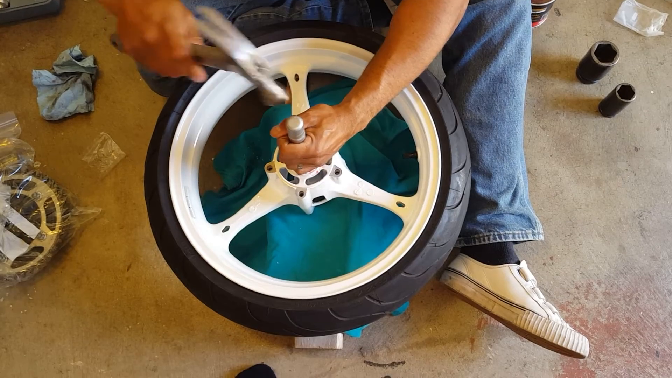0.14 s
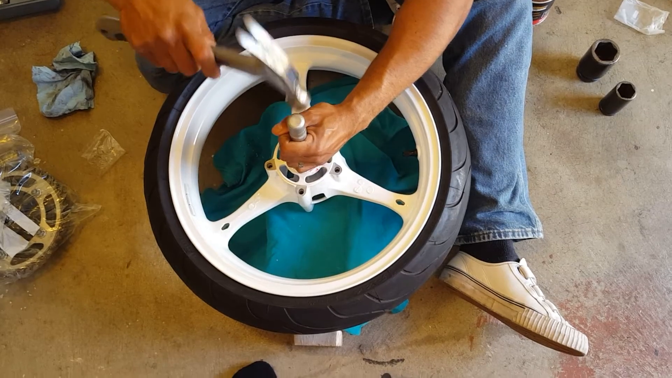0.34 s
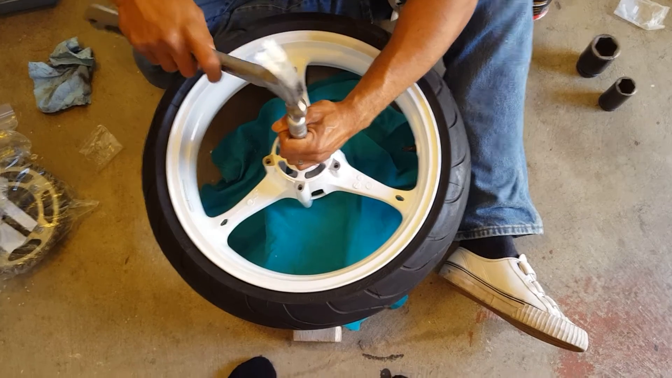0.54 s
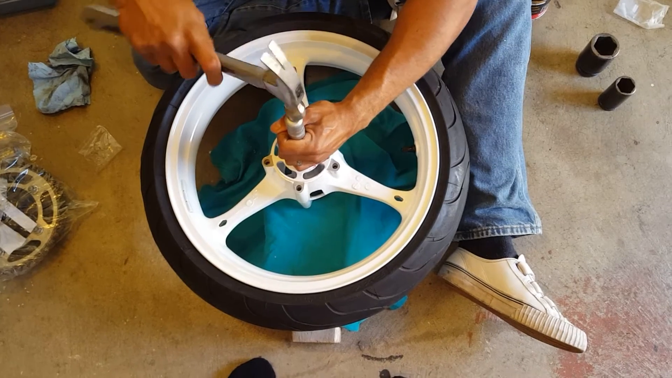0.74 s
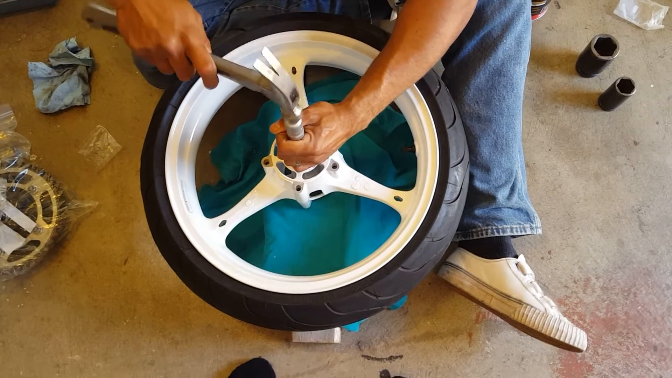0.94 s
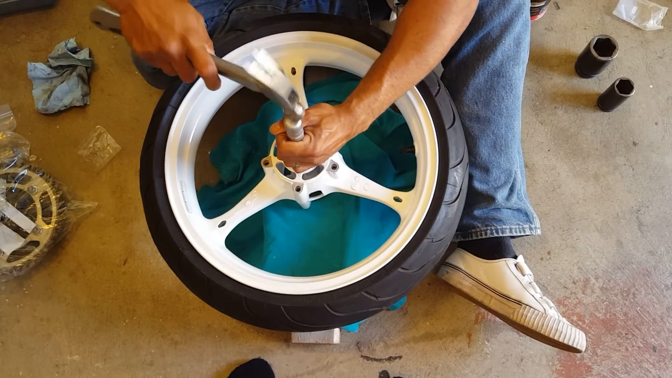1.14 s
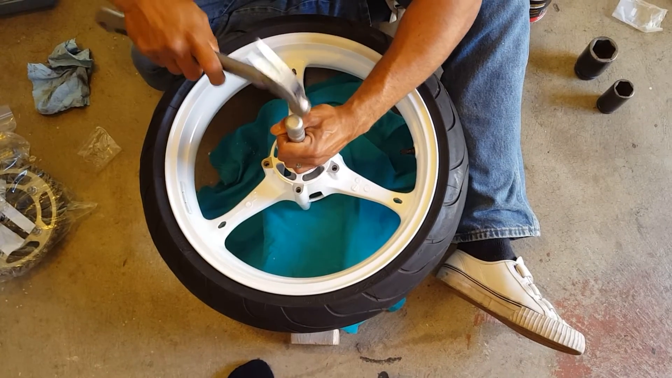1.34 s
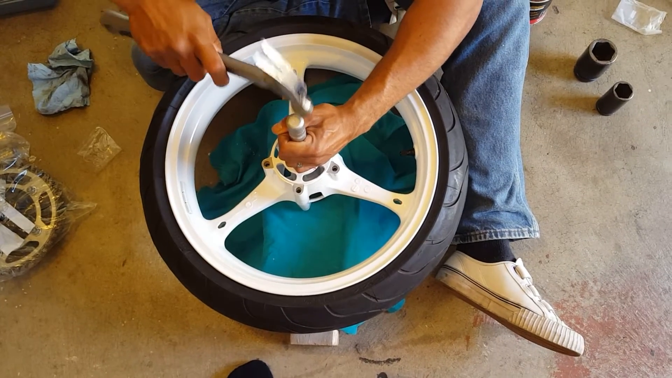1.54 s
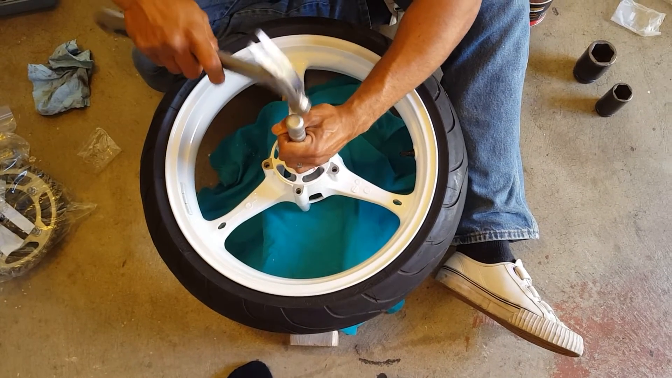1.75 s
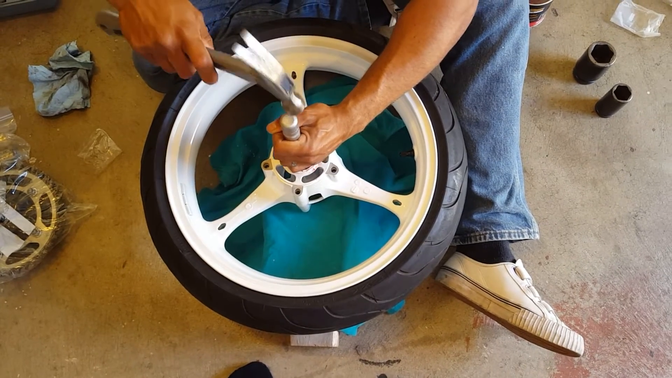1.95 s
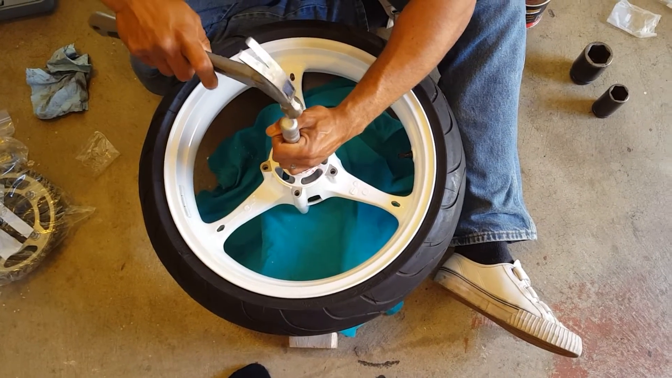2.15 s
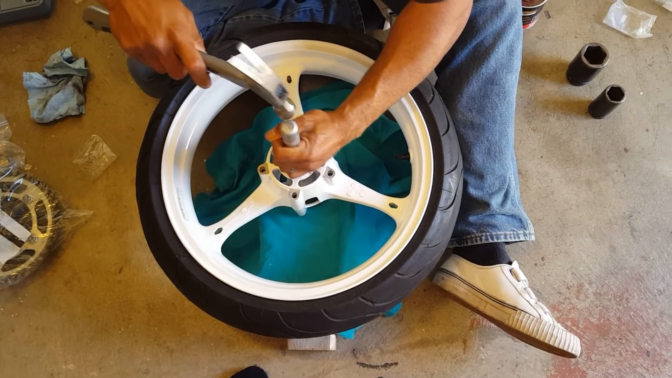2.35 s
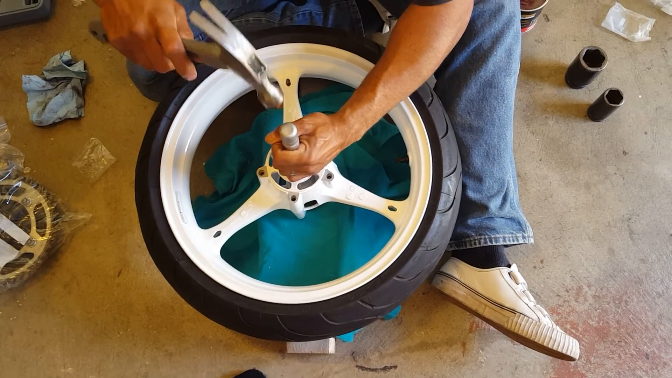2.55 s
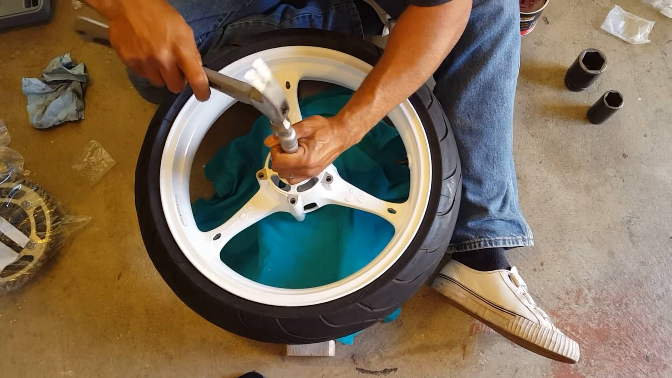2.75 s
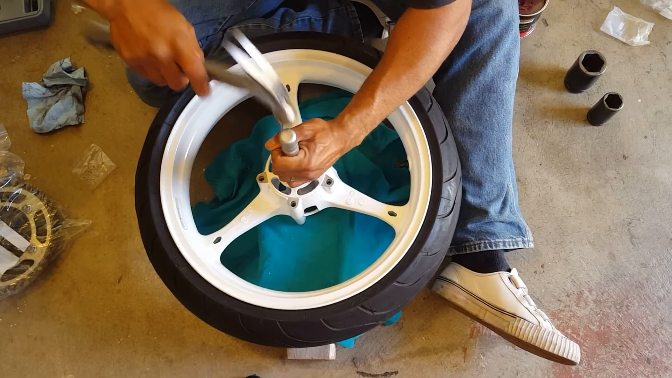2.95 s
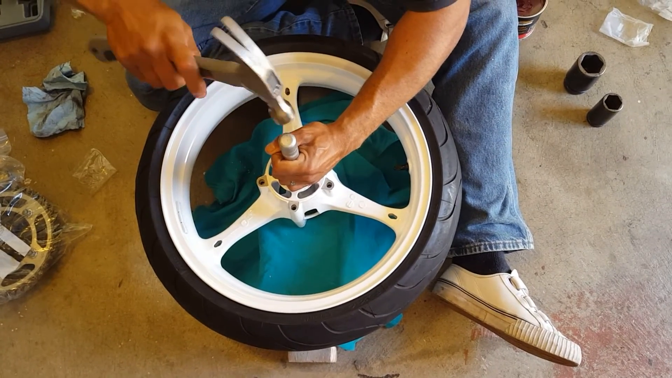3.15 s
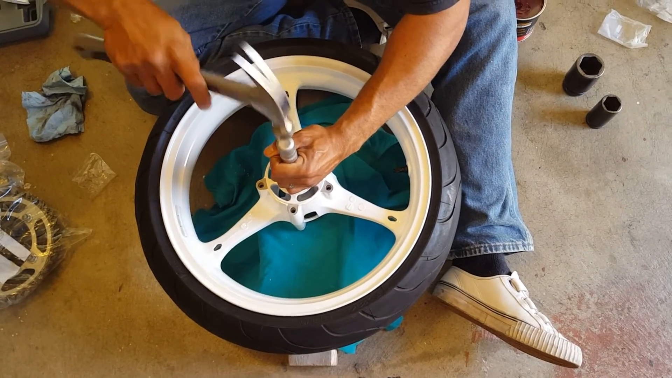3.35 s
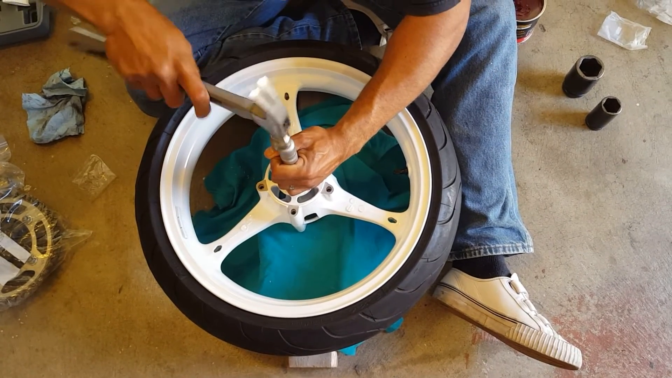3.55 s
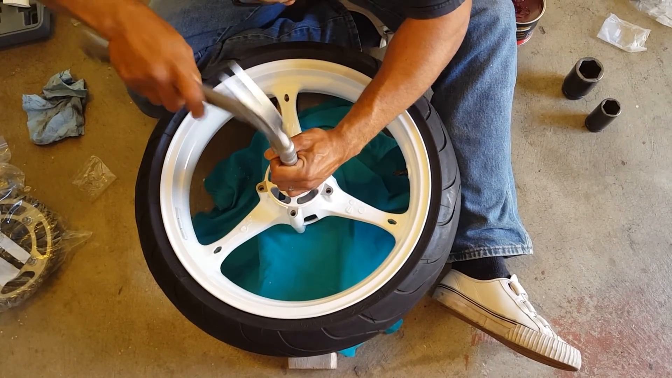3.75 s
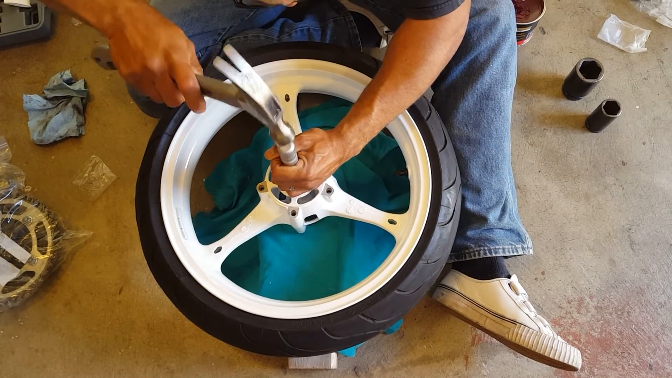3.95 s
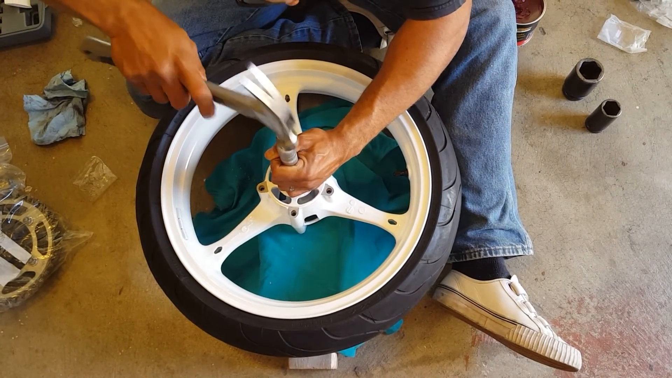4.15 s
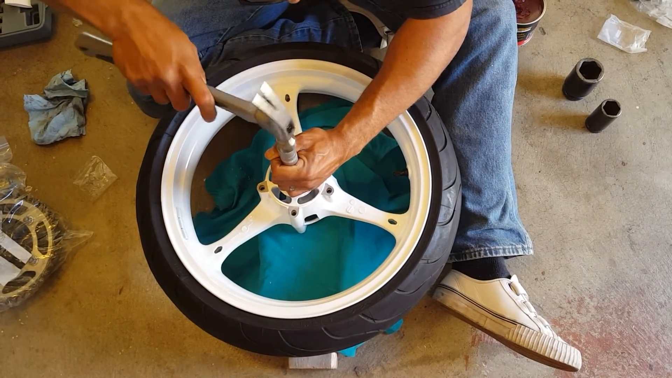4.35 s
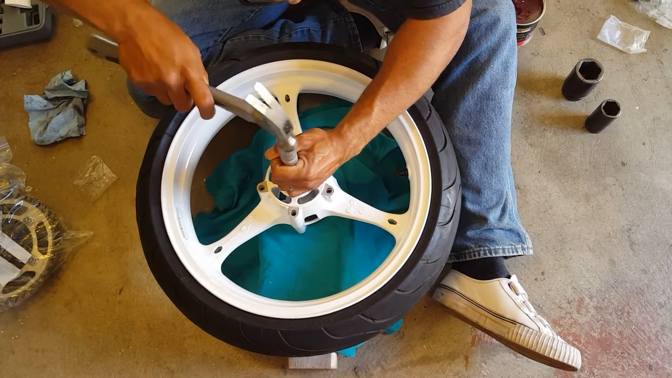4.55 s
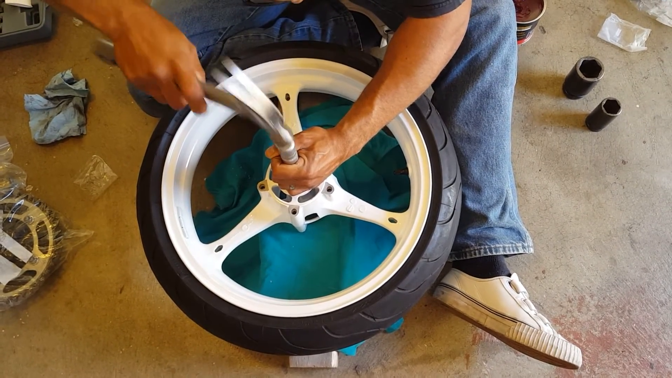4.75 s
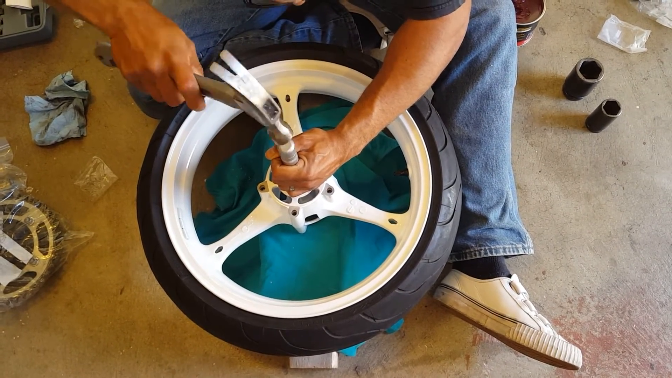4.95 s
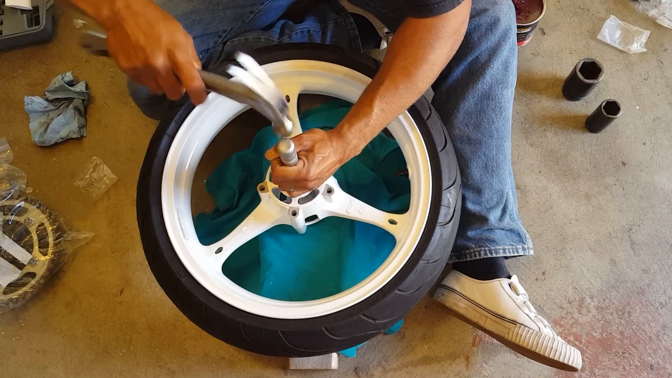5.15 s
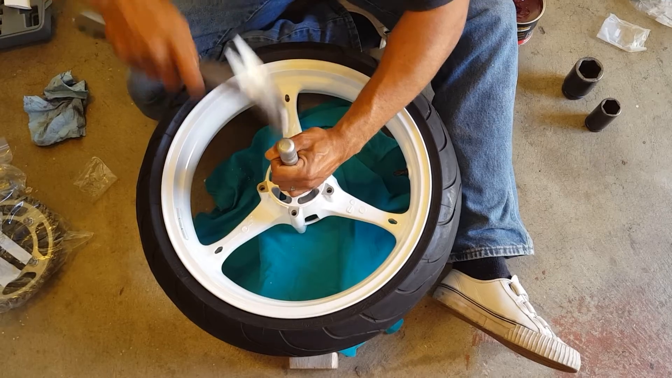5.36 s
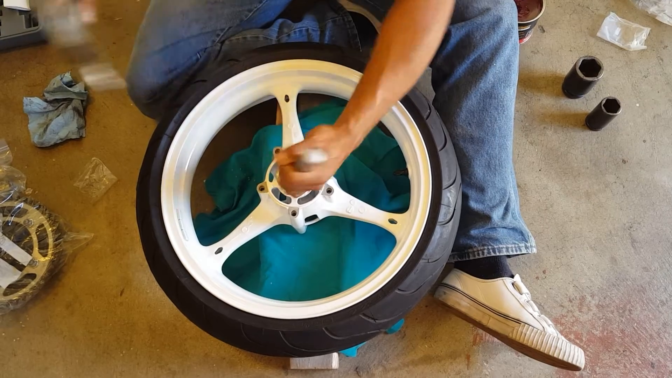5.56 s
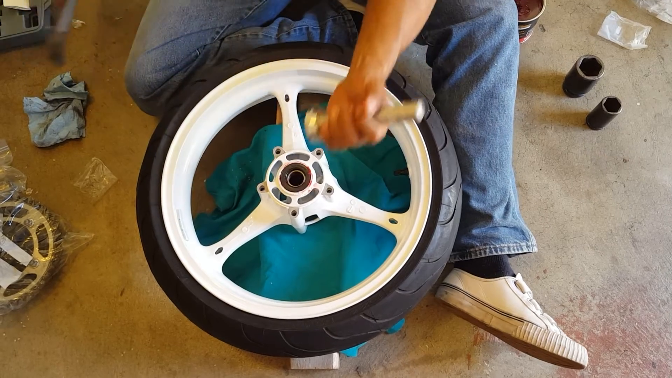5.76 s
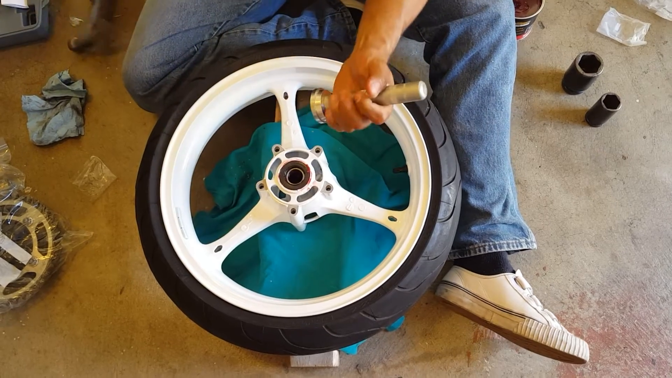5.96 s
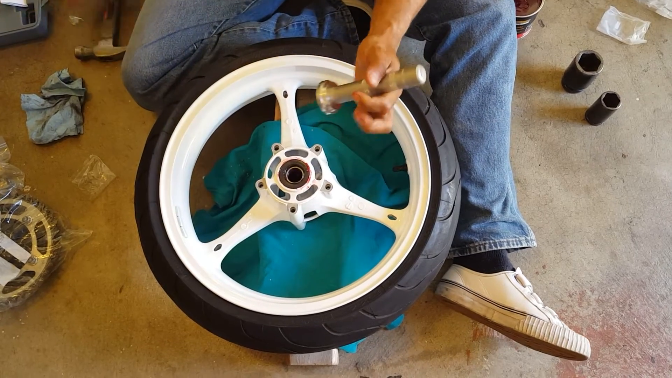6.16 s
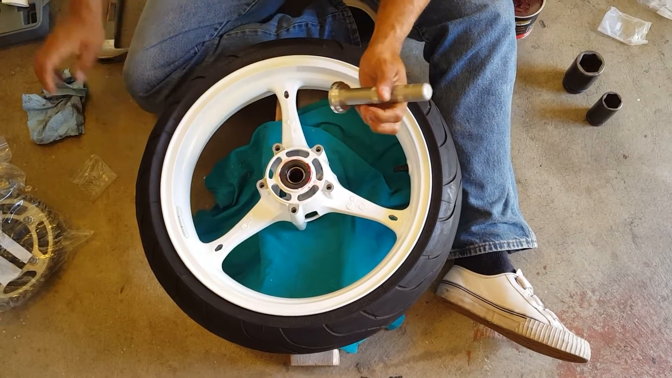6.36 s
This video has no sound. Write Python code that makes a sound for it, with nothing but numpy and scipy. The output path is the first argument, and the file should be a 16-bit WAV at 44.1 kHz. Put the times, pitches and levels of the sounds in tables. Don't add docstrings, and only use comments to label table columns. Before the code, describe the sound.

For the first half second, distant birds chirp and whistle outside over airy ambience and a low engine drone. At 0.5 s a steel hammer lands its strongest blow on a metal driver in a wheel hub: sharp crack, hollow thud, short high ring, and a bright garage echo lasting about half a second. Lighter taps follow every 0.2 s or so until 2.0 s, with a barely audible touch at 2.3 s. From 2.8 to 5.3 s a second, even run of eleven blows comes about every quarter second, less boomy, the knock growing firmer and the contact crisper, with faint floor thumps. The background sinks as the blows begin. Echo dies away; faint bird notes return from 5.7 s. Around 6.0 s the hammer softly touches concrete, lands with a clack at 6.1 s, and rattles in small ringing bounces until 6.3 s. Close stereo phone pickup from above.

```python
import sys
import numpy as np
from scipy import signal
from scipy.fft import rfft, irfft, next_fast_len
from scipy.io import wavfile
from scipy.ndimage import uniform_filter1d, minimum_filter1d

SR = 44100
rng = np.random.default_rng(int(sys.argv[2]) if len(sys.argv) > 2 else 0)


def volts_from_db(level):
    exponent = np.asarray(level, float) / 20
    return 10 ** exponent


def store_wav(level_fs):
    pcm = np.round(np.clip(np.atleast_2d(level_fs), -1, 1) * 32767)
    wavfile.write(sys.argv[1], SR, pcm.T.astype(np.int16))


N = 282284

# (frequency [Hz], level [dB])
OUTSIDE_TONE = [(25, -21), (82, -6), (250, -11.5), (1500, -26.5), (1750, -28.5), (3000, -25), (3900, -31.5),
                (5700, -44), (7300, -31), (9300, -50.5), (12200, -38), (16000, -46)]
# (frequency [Hz], width [Hz], level [dB])
ENGINE_HUMS = [(75.5, 11, -1.5), (146, 18, -7), (56.7, 18, -8.5)]
# (time [s], pitch [Hz], level [dB])
CHIRP_SHAPE = [(0, 1690, -12), (.030, 1800, -1), (.038, 2600, 4), (.05, 2800, -5), (.063, 3050, 0),
               (.071, 3950, -11)]
# (time [s], level [dB])
CHIRP_TIMES = [
    (0.011, -60),
    (0.152, -59),
    (0.292, -59.5),
    (0.439, -60.5),
    (5.698, -71.5),
    (5.846, -72),
    (5.991, -69.5),
]
# (time [s], length [s], start pitch [Hz], end pitch [Hz], level [dB])
WHISTLE_NOTES = [
    (0, 0.039, 2670, 2630, -47),
    (0.224, .03, 3000, 2550, -44),
    (.245, .045, 2510, 2400, -32),
    (0.286, .045, 2380, 1990, -30),
    (0.336, 0.1, 1960, 2088, -42.5),
    (5.837, 0.068, 2584, 2750, -59),
    (5.898, 0.096, 2378, 2282, -48.5),
    (5.98, 0.133, 3400, 3310, -59),
    (6.076, 0.056, 2310, 2310, -53),
]
# (frequency [Hz], time to fade 60 dB [s])
GARAGE_FADE = [(60, 0.72), (230, 0.46), (450, 0.53), (900, 0.67), (1840, 0.66), (4850, 0.62), (8000, 0.5),
               (12800, 0.29)]
# (frequency [Hz], level [dB])
GARAGE_COLOUR = [(90, -10), (230, -3.5), (420, -3.5), (800, -9), (1840, -3), (2350, -6), (4850, -5),
                 (8000, -8.5), (12800, -9)]
# (frequency [Hz], likeness [0-1])
GARAGE_LIKENESS = [(100, 1), (400, 0.92), (800, 0.3), (1500, 0), (4000, .05), (12000, 0.29)]
# (delay [s], level [dB])
FIRST_ECHOES = [
    (.0078, -15),
    (.0128, -16),
    (.0165, -18),
]
# (frequency [Hz], level [dB])
ECHO_COLOUR = [(300, 2.5), (2200, 7), (5000, -5)]
# (time [s], strength [dB], sharpness [dB], spot across face [mm], spot along face [mm])
HAMMER_BLOWS = [(0.5223, -9, -2, -5, 10.5), (0.7597, -13.5, -3.5, 5, 16), (0.9836, -15, -2.5, 0.5, 3),
                (1.1899, -15.5, 0.5, -42, -1.5), (1.4018, -15.5, -16.5, 8.5, -15.5),
                (1.5977, -19, -5.5, -7, 1.5), (1.8125, -16, -1.5, -3.5, 0), (2.032, -20.5, 6, 6.5, 6),
                (2.2935, -40, -47, 7, 10), (2.7845, -16, 1, -7, 2), (3.049, -14.5, -0.5, 8.5, -18.5),
                (3.3142, -15, -5.5, 4.5, -13.5), (3.5798, -14, -0.5, -5, -8), (3.8414, -14, 2, -1, -5),
                (4.1042, -15, 6, 0, -8.5), (4.3555, -15, 5.5, 2, -8), (4.5994, -15.5, 7.5, 4, -5),
                (4.8479, -14.5, 6, -8, -3.5), (5.0865, -14, 7.5, -7, -4.5), (5.3248, -15, 2.5, -7, -0.5)]
# (frequency [Hz], level [dB])
CRACK_COLOUR = [(90, -24.5), (170, 0.5), (330, 15.5), (700, 14.5), (1350, 11.5), (1660, 5.5), (2100, 6),
                (3000, 8.5), (3900, 0.5), (7600, 8), (8900, -2.5), (9600, -21.5), (10900, -0.5),
                (15000, 2.5)]
# (frequency [Hz], width [Hz], lift [dB])
WHEEL_RESONANCES = [(155.3, 60, 12), (388.4, 61, 5.5), (490, 11, -10), (630, 66, -13), (747, 51.5, -1.5),
                    (1208, 18, -3), (1441, 21, 0), (1855, 50, -1), (2007, 100, 5), (2265, 290, 5.5),
                    (2522, 34, -0.5), (3380, 88, -6)]
# (frequency [Hz], level [dB], time to fade 60 dB [s])
LOWER_TONES = [(4665, -1, .07), (4735, -5, .05), (4802, 0, .09)]
UPPER_TONES = [(5880, -4, .06), (5925, -2, .08), (5960, 0, .1), (6005, -3, .07), (6160, -8, .08)]
TOP_TONES = [(7180, -5, .03), (7335, 0, .06), (7410, -4, .04), (7600, -5, .03), (8790, -19, .15)]
CLUSTER_LEVELS = [-1.5, 0, 1.5]
# (time [s], level [dB])
FLOOR_JOLTS = [(0.522, -63), (1.188, -45.5), (2.029, -45), (2.784, -53.5), (3.31, -44.5), (3.582, -45.5),
               (3.84, -43), (4.355, -48), (4.602, -42), (4.85, -41), (5.089, -38), (5.322, -50)]
# (time [s], strength [dB], sharpness [dB], thud [dB], spot across face [mm])
FLOOR_TAPS = [
    (6.033, -56, -48, 4.5, 4),
    (6.077, -58, -33, 2, 2),
    (6.121, -26.5, -2.5, -9, -0.5),
    (6.1774, -33, -8, -10.5, 3),
    (6.2008, -30.5, -4, -15, 8),
    (6.2317, -36.5, -12, -10.5, 5),
    (6.2465, -37, 7.5, -4.5, 6.5),
    (6.2806, -39.5, -16, -10, 2.5),
]
# (frequency [Hz], left minus right [dB])
PORT_DIFFERENCE = [(60, .5), (250, 1.4), (600, -.3), (1200, -2.5), (2400, -7), (4400, -1), (6000, 1),
                   (15000, 1.5)]

AIR_DB, ENGINE_DB = -52, -50
GAIN_SINK_DB, GAIN_SINK_S, ENGINE_FADE_DB, ENGINE_FADE_S = -20, 1.3, -11.5, 1.5
WHISTLE_ATTACK, WHISTLE_RELEASE = 0.18, .75
WHISTLE_START_DB, WHISTLE_END_DB = -16.5, -16
CRACK_DB, CRACK_PER_SHARP, SIZZLE_DB = 2, 0.32, -9
REGRIP_S = 2.5
BOOM_LOOSE_DB, BOOM_HELD_DB = -1.5, -8
HUB_LOOSE_DB, HUB_HELD_DB, HUB_RISE_DB_PER_S = -1, -2, 2
RING_DB, RING_PER_SHARP, RING_LOSS_DB_PER_MM = -7.5, 0.14, 0.47
RING_HELD_DB, RING_FLOOR_DB = -2, 4.5
LIMIT_DB, LIMIT_SHARE, LOOK_AHEAD_S = -17, 0.16, 0.026
TOP_HZ = 15750


def along(table, hz):
    f, v = np.transpose(table)
    return np.interp(np.log(np.maximum(hz, 1)), np.log(np.maximum(f, 1)), v)


def colour(x, table, share=1, causal=False):
    size = 2 * next_fast_len(x.shape[-1] // 2 + 1024)
    gain = volts_from_db(share * along(table, np.fft.rfftfreq(size, 1 / SR)))
    if causal:
        cepstrum = irfft(np.log(gain), size)
        fold = np.r_[1, np.full(size // 2 - 1, 2), 1, np.zeros(size // 2 - 1)]
        gain = np.exp(rfft(cepstrum * fold))
    return irfft(rfft(x, size) * gain, size)[..., :x.shape[-1]]


def unit(x):
    return x / np.sqrt(np.mean(x ** 2))


def add(out, x, s):
    i = int(s * SR)
    out[..., i:i + x.shape[-1]] += x[..., :out.shape[-1] - i]


def outside():
    since = np.maximum(np.arange(N) / SR - HAMMER_BLOWS[0][0], 0)
    noise = rng.standard_normal((3, N))
    air = unit(colour(noise[0] + 1.1 * noise[1:], OUTSIDE_TONE))
    rumble = noise[0] + 0.21 * noise[1:]
    engine = 0
    for hz, width, db in ENGINE_HUMS:
        b, a = signal.iirpeak(hz, hz / width, fs=SR)
        hum = signal.lfilter(b, a, signal.lfilter(b, a, rumble))
        engine = engine + volts_from_db(db) * unit(hum)
    fade_db = ENGINE_FADE_DB * (1 - np.exp(-since / ENGINE_FADE_S))
    gain_db = GAIN_SINK_DB * (1 - np.exp(-since / GAIN_SINK_S))
    return volts_from_db(gain_db) * (volts_from_db(AIR_DB) * air + volts_from_db(ENGINE_DB + fade_db) * engine)


def note(rows):
    s, hz, db = np.transpose(rows)
    t = np.arange(s[0], s[-1], 1 / SR)
    edge = np.clip(np.minimum(t - s[0], s[-1] - t) / 0.0042, 0, 1)
    phase = 2 * np.pi * np.cumsum(np.interp(t, s, hz)) / SR
    return edge * volts_from_db(np.interp(t, s, db)) * np.sin(phase)


def whistle(length, from_hz, to_hz, db):
    share = np.array([0, WHISTLE_ATTACK, WHISTLE_RELEASE, 1])
    hz = from_hz + (to_hz - from_hz) * share
    level_db = db + np.array([WHISTLE_START_DB, 0, 0, WHISTLE_END_DB])
    return note(np.c_[length * share, hz, level_db])


def birds():
    out = np.zeros(N)
    for s, db in CHIRP_TIMES:
        add(out, volts_from_db(db + 18.0) * note(CHIRP_SHAPE), s)
    for s, *row in WHISTLE_NOTES:
        add(out, whistle(*row), s)
    return np.array([.6 * out, np.roll(out, 9)])


def garage(x):
    t = np.arange(SR) / SR
    tail = np.zeros((2, SR))
    for hz in 70 * 2 ** np.arange(0, 8, .5):
        sos = signal.butter(2, [hz / 2 ** .25, hz * 2 ** .25], "band", fs=SR, output="sos")
        mid, side = signal.sosfilt(sos, rng.standard_normal((2, SR)))
        alike = np.clip(along(GARAGE_LIKENESS, hz), 0, 1)
        pair = np.sqrt(1 + alike) * mid + np.sqrt(1 - alike) * side * np.array([[1], [-1]])
        fade = np.exp(-np.log(1000) * t / along(GARAGE_FADE, hz))
        tail += volts_from_db(along(GARAGE_COLOUR, hz)) * pair * (fade + volts_from_db(-31) * fade ** 0.4)
    tail *= np.minimum(5 - 5 * t, 1)
    tail *= volts_from_db(-33.0) * (1 - np.exp(-(t / 0.014) ** 2))
    echoes = np.zeros((2, SR))
    for s, db in FIRST_ECHOES:
        echoes[0, int(s * SR)] += volts_from_db(db)
        echoes[1, int(s * SR) + 7] += volts_from_db(db)
    tail += colour(echoes, ECHO_COLOUR, causal=True)
    return signal.fftconvolve(x[None], tail, axes=1)[:, :N]


def shock(size):
    hz = np.fft.rfftfreq(size, 1 / SR)
    knots = np.linspace(0, SR / 2, 60)
    chance = rng.random((3, len(knots)))
    spread = 1 - .7 * np.exp(-(knots / 1500) ** 2)
    late = .003 + spread * (.0055 * chance[0] ** 1.5 - .002)
    late = late + .0004 * chance[1:] * knots / 8000
    delay = np.array([np.interp(hz, knots, row) for row in late])
    click = irfft(np.exp(-2j * np.pi * np.cumsum(delay, axis=1) * hz[1]), size)
    s = np.arange(size) / SR
    return click * np.clip((s - .0008) / .0006, 0, 1) * (s < .02)


def blow(crack_db, boom_db, hub_db, driver_db, sizzle_db, seated):
    level = [(430, boom_db), (560, hub_db), (1400, hub_db), (1700, driver_db), (3300, driver_db),
             (3900, crack_db), (8000, crack_db), (8900, (crack_db + sizzle_db) / 2), (10000, sizzle_db)]
    hz, width, db = np.array(WHEEL_RESONANCES).T[:, :, None]
    grid = np.geomspace(60, 17000, 700)
    peak = volts_from_db(db + 2.5 * rng.standard_normal(db.shape))
    lift = peak / (1 + (2 * (grid - hz) / width) ** 2)
    wheel_db = seated * 20 * np.log10(1 + lift.sum(axis=0))
    total_db = along(CRACK_COLOUR, grid) + along(level, grid) + wheel_db
    contact = shock(SR // 4) + .4 * np.roll(shock(SR // 4), SR // 500, axis=1)
    return colour(contact, np.c_[grid, total_db], causal=True) * volts_from_db(23.0)


def strike(db, sharp_db, boom_db, hub_db, seated):
    crack_db = db + CRACK_DB + CRACK_PER_SHARP * sharp_db
    sizzle_db = db + SIZZLE_DB + sharp_db
    return blow(crack_db, db + boom_db, db + hub_db, db, sizzle_db, seated)


def ring(modes, t):
    hz, db, t60 = np.array(modes).T[:, :, None]
    chance = rng.standard_normal((4, len(modes), 1))
    turn = 2 * np.pi * hz * (1 + .002 * chance[0]) * t + 3 * chance[1]
    fade = np.exp(-np.log(1000) * t / t60)
    body = volts_from_db(db + 2 * chance[2]) * fade * (1 - np.exp(-t / .001))
    apart = np.array([1, -1])[:, None, None] * chance[3]
    return (body * np.sin(turn + apart)).sum(axis=1) / np.sqrt(np.sum(volts_from_db(db) ** 2))


def head(lower_db, upper_db, top_db):
    t = np.arange(SR // 4) / SR
    clusters = [(LOWER_TONES, lower_db), (UPPER_TONES, upper_db), (TOP_TONES, top_db)]
    return sum(volts_from_db(db + 7.5) * ring(modes, t) for modes, db in clusters)


def face(db, sharp_db, across, lengthwise):
    towards = 2 * np.pi * np.arange(3) / 3
    lean_db = across * np.cos(towards) + lengthwise * np.sin(towards)
    loss_db = RING_LOSS_DB_PER_MM * np.hypot(across, lengthwise)
    ring_db = db + RING_DB + RING_PER_SHARP * sharp_db
    return head(*(ring_db + np.array(CLUSTER_LEVELS) + lean_db - loss_db))


def hammering():
    out = np.zeros((2, N))
    for s, db, sharp_db, across, lengthwise in HAMMER_BLOWS:
        held = s > REGRIP_S
        boom_db = BOOM_HELD_DB if held else BOOM_LOOSE_DB
        hub_db = HUB_HELD_DB + HUB_RISE_DB_PER_S * (s - REGRIP_S) if held else HUB_LOOSE_DB
        add(out, strike(db, sharp_db, boom_db, hub_db, seated=1), s - .0027)
        add(out, face(db + RING_HELD_DB * held, sharp_db, across, lengthwise), s - .0015)
    return out


def jolts():
    out = np.zeros((2, N))
    t = np.arange(SR // 8) / SR
    swing = np.sin(2 * np.pi * 105 * t + np.array([[0], [1.6]]))
    thump = swing * (t / 0.0026) * np.exp(-t / 0.0033)
    for s, db in FLOOR_JOLTS:
        add(out, volts_from_db(db + 20.5) * thump, s)
    return out


def rattle():
    out = np.zeros((2, N))
    for s, db, sharp_db, thud_db, across in FLOOR_TAPS:
        add(out, strike(db, sharp_db, thud_db, thud_db, seated=0), s - .003)
        add(out, face(db + RING_FLOOR_DB, sharp_db, across, 0), s - .0015)
    return out


def limiter(x):
    size = int(LOOK_AHEAD_S * SR)
    peak = -minimum_filter1d(-abs(x).max(axis=0), size, origin=-(size // 3))
    over_db = np.maximum(20 * np.log10(peak + 1e-9) - LIMIT_DB, 0)
    return x * volts_from_db(-LIMIT_SHARE * uniform_filter1d(over_db, size))


def scene():
    near = hammering() + rattle()
    far = birds()
    return near + far + garage(near[0] + far[1]) + jolts() + outside()


def band_limit(x):
    return signal.sosfilt(signal.butter(12, 16840, fs=SR, output="sos"), x)


def record(dry):
    left = colour(dry[0], PORT_DIFFERENCE, share=.5)
    right = colour(np.roll(dry[1], 2), PORT_DIFFERENCE, share=-.5)
    rounded = np.tanh(limiter(np.array([left, right])))
    top_cut = signal.ellip(8, .2, 70, TOP_HZ, fs=SR, output="sos")
    mix = signal.sosfilt(top_cut, rounded)
    return band_limit(mix)


dry = scene()
out = record(dry)
store_wav(out)
```